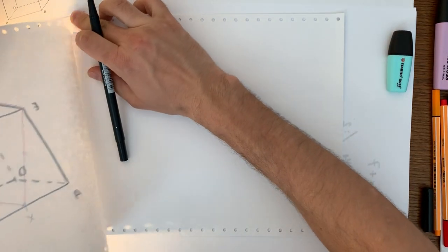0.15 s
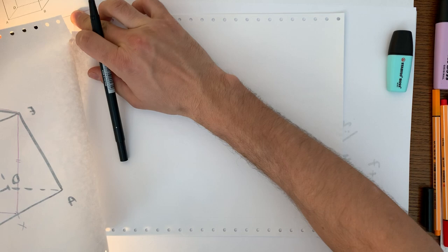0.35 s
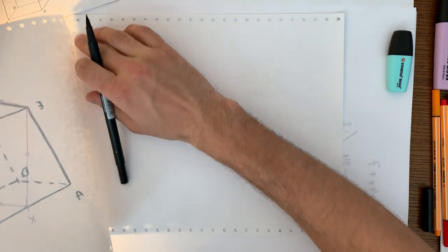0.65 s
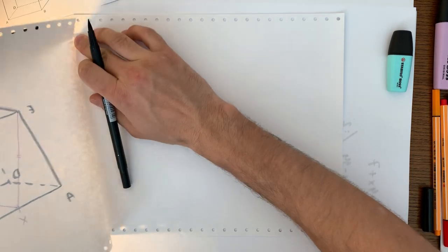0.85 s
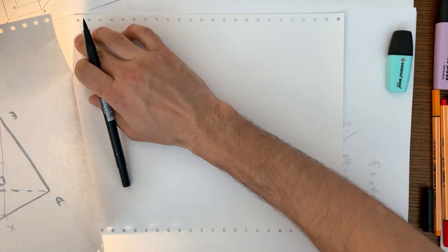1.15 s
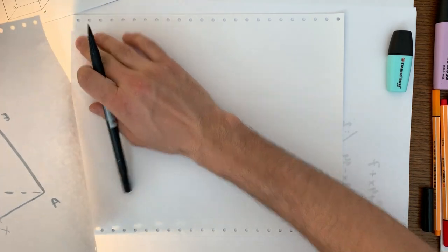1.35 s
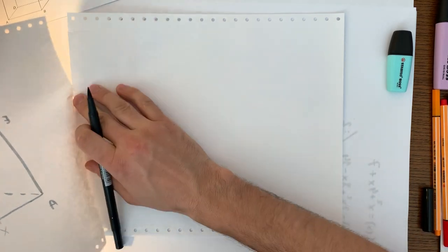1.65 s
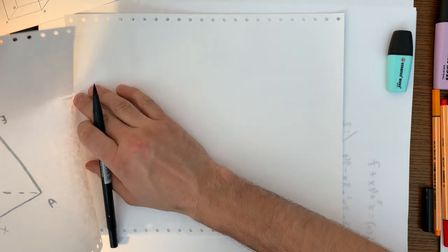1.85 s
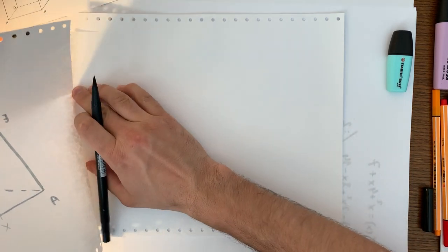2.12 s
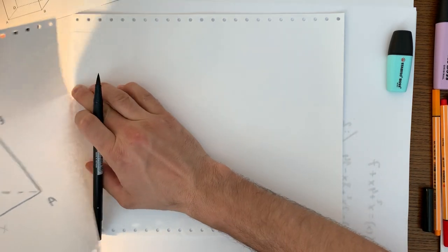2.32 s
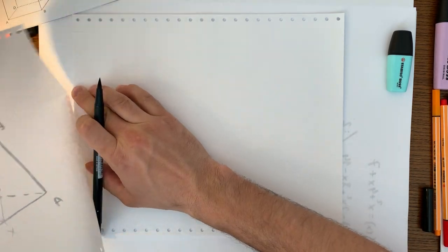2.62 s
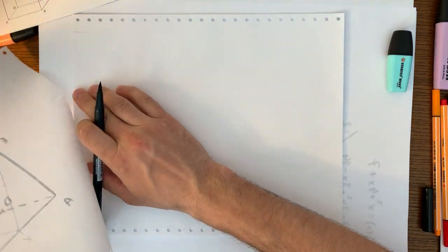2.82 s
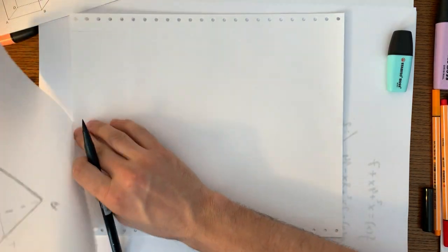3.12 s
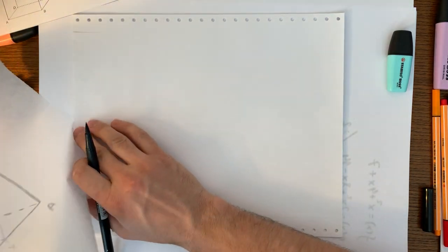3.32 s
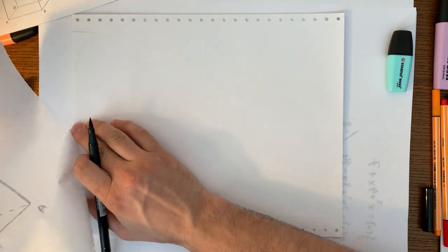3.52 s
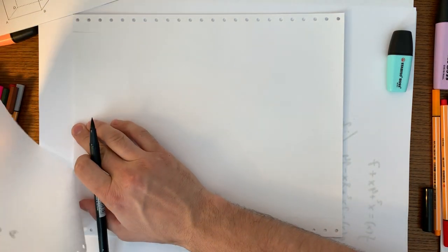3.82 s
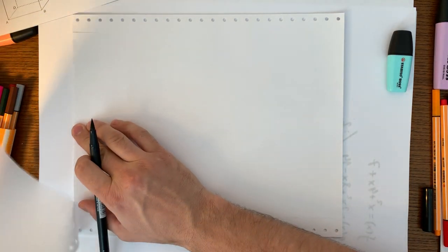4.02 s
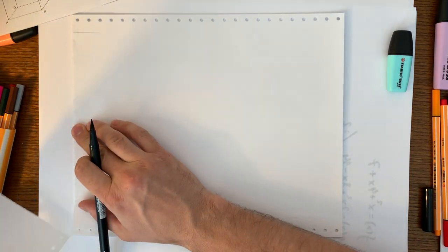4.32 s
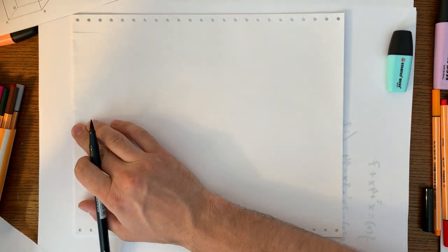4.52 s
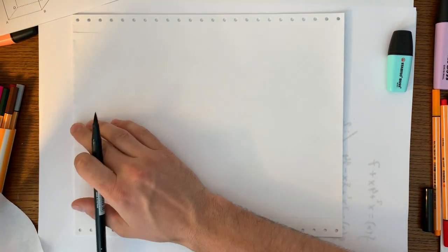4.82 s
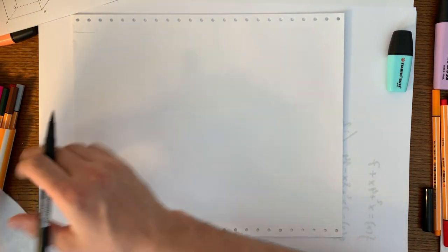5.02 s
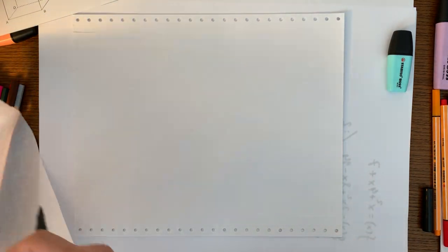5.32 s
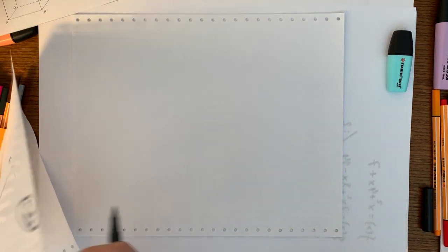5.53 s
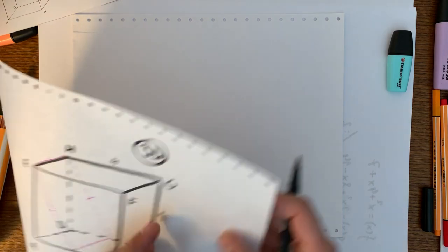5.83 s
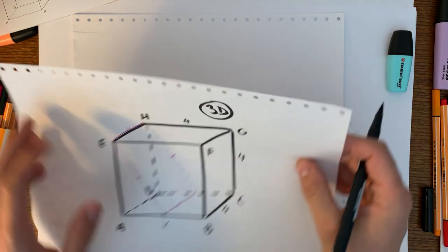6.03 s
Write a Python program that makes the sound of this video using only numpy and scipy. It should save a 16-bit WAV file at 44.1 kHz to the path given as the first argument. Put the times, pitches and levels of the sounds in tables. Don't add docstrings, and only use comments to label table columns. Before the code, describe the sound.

Close-miked paper tearing: a short burst of crisp snaps, a pause with faint creaks, two quick jerks, then a few isolated cracks and the loudest, hardest rip. Light crinkling follows before a long chain of rapid bright snaps finishes the tear. After a near-silent moment, the loose sheet hisses, rustles and softly crackles on the desk. The room is quiet, with a short airy tail.

```python
import sys
import numpy as np
from scipy import signal
from scipy.fft import rfft, irfft
from scipy.io import wavfile
from scipy.ndimage import uniform_filter1d

SR = 44100
rng = np.random.default_rng(int(sys.argv[2]) if len(sys.argv) > 2 else 0)


def transcribe(u):
    v = np.clip(np.atleast_2d(u).T, -1, 1)
    q = np.round(v * 32767).astype(np.int16)
    wavfile.write(sys.argv[1], SR, q)


def to_linear_factor(level_db):
    exponent = np.asarray(level_db, float) / 20
    return 10 ** exponent


N = 271788


def rms_one(x):
    return x / np.sqrt(np.mean(x ** 2) + 1e-20)


def at_hz(points, hz):
    table_hz, values = np.array(points)[:, :2].T
    return np.interp(np.log(hz), np.log(table_hz), values)


def band(x, low_hz, high_hz):
    return signal.sosfilt(signal.butter(2, [low_hz, high_hz], "band", fs=SR, output="sos"), x)


def colour(x, spectrum):
    size = 2 ** 12
    hz = np.maximum(np.arange(size // 2 + 1) * SR / size, 1)
    cepstrum = irfft(np.log(to_linear_factor(at_hz(spectrum, hz))))
    cepstrum[1:size // 2] *= 2
    cepstrum[size // 2 + 1:] = 0
    return signal.fftconvolve(x, irfft(np.exp(rfft(cepstrum))))[:len(x)]


def drift(rate):
    hop, settle = 40, 2000
    r = np.exp(-2 * np.pi * hop * rate / SR)
    draws = rng.standard_normal(N // hop + settle + 2)
    slow = signal.lfilter([1], [1, -2 * r, r * r], draws)[settle:]
    return np.interp(np.arange(N) / hop, np.arange(len(slow)), rms_one(slow))


def quiet_room_floor():
    floor_colour = [(20, 20.5), (60, -26), (300, 2), (1000, -7), (4000, 5.5), (12000, -35), (16000, -1)]
    return to_linear_factor(-77) * rms_one(colour(rng.standard_normal(N), floor_colour))


def grains(per_s, spread_db, smooth):
    sizes = to_linear_factor(spread_db * np.minimum(rng.exponential(1, N), 3.6)) * rng.choice([-1, 1], N)
    slips = rms_one(sizes * (rng.random(N) < per_s / SR))
    return rms_one(slips + smooth * rng.standard_normal(N))


def gestures(rows, attack_db_per_s, swell_db, release_db_per_s, mix_db):
    # rub, rustle, hiss, flap [dB per dB]
    bright_share = [-2.07, 0.49, 1, -0.73]
    t, power = np.arange(0, N + 64, 64) / SR, 0
    for s, length, db, bright, *bend in rows:
        onset = attack_db_per_s * np.maximum(s - t, 0)
        swell = swell_db * np.clip(1 - (t - s) / length, 0, 1)
        release = release_db_per_s * np.maximum(t - s - length, 0)
        shape = db - onset - swell - release
        bend_db = [0, sum(bend), 0, 0]
        layers_db = np.array(mix_db) + bright * np.array(bright_share) + bend_db
        power = power + to_linear_factor(shape + layers_db[:, None]) ** 2
    return np.array([np.interp(np.arange(N) / SR, t, layer) for layer in power])


def handling():
    # start/s, length/s, effort/dB, brightness/dB
    tug_rows = [
        (.181, 0.11, -43, -3),
        (1.044, 0.1, -39.5, -1.5),
        (1.323, 0.01, -39, -3),
        (1.771, 0.018, -44.5, -2.5),
        (2.393, 0.07, -35, 1),
        (3.674, 0.11, -36, 1),
        (3.9, 0.23, -36, 2),
        (4.2, 0.14, -40.5, -0.5),
    ]
    # start/s, length/s, speed/dB, brightness/dB, bend/dB
    slide_rows = [(0, 0.016, -68, 2, -8), (.45, 0.17, -73, -2, 5), (.78, 0.0092, -75.5, -5, 4),
                  (.92, 0.023, -70, -7, -1), (1.65, 0.027, -59, -1.5, -2), (1.70, 0.017, -71, -4.5, -1),
                  (1.75, 0.014, -60, -0.5, -1), (2.065, 0.026, -68.5, 1, 3.5), (2.62, 0.11, -75, 6.5, 12),
                  (2.72, .06, -75.5, 11, 1), (2.83, 0.049, -61.5, 3, -1), (2.92, 0.019, -65, 4, 3),
                  (2.94, 0.028, -72, -5.5, 11), (3.03, 0.075, -67, 0, -6), (3.16, 0.078, -59.5, 2.5, 4.5),
                  (3.35, 0.045, -60, -1, 9), (3.41, 0.037, -65, -3, 2), (4.46, 0.067, -64, 2, 4.5),
                  (4.6, 0.3, -71, 7.5, 7.5), (4.72, 0.33, -66, 1, 5), (5.13, 0.047, -60, 2.5, 4),
                  (5.2, 0.057, -55, 3.5, 3.5), (5.27, 0.044, -54.5, 4.5, 3), (5.4, 0.27, -66.5, 1, 3),
                  (5.81, 0.059, -69, -4, -3), (5.93, 0.11, -61, 1, -6), (6.04, 0.031, -63, 4, 0),
                  (6.115, 0.018, -58, 0, -17)]
    tug_mix = [-6.5, -0.87, -21, -19]
    slide_mix = [2, -4.5, -1, -13]
    rest_db = [-74.5, -112, -78, -75.5]
    # f/Hz, level/dB
    rub_colour = [(200, -15.5), (350, -4), (650, -0.5), (1000, 0.5), (1500, -4), (3500, -24)]
    rustle_colour = [(600, -35), (1000, -10.5), (1300, -11), (2500, -4), (3600, -7.5), (4600, -14.5),
                     (7000, -24)]
    hiss_colour = [(2500, -14), (4000, -10), (5500, 2.5), (7000, 3), (8300, 4), (10000, 4), (12500, 4.5),
                   (16000, -5.5)]
    flap_colour = [(20, -18), (40, 9), (70, 5.5), (150, 5.5), (300, -0.5), (450, -34.5)]
    tugs = gestures(tug_rows, attack_db_per_s=3000, swell_db=7, release_db_per_s=163, mix_db=tug_mix)
    slides = gestures(slide_rows, attack_db_per_s=233, swell_db=1.5, release_db_per_s=128, mix_db=slide_mix)
    rest = to_linear_factor(np.array(rest_db))[:, None] ** 2
    rub_db, rustle_db, hiss_db, flap_db = 10 * np.log10(tugs + slides + rest)
    clumps = drift(15.3)
    rub = rms_one(colour(grains(800, 3.0, smooth=1.5), rub_colour))
    rub = rub * to_linear_factor(rub_db + 1.5 * clumps + .8 * drift(30))
    rustle = rms_one(colour(grains(1500, 3.0, smooth=.7), rustle_colour))
    rustle = rustle * to_linear_factor(rustle_db + 1.7 * clumps)
    hiss = rms_one(colour(grains(7500, 1.7, smooth=1.2), hiss_colour))
    hiss = hiss * to_linear_factor(hiss_db + 1.1 * clumps + .5 * drift(40))
    flap = rms_one(colour(rng.standard_normal(N), flap_colour)) * to_linear_factor(flap_db + drift(7.7))
    return rub + rustle + hiss, flap


def patchy(x):
    octaves = np.log2(np.maximum(np.arange(N // 2 + 1) * SR / N, 1) / 350)
    whole, out = rfft(x), 0
    for k in range(12):
        share = np.clip(1 - np.abs(2 * np.clip(octaves, 0, 5.5) - k), 0, 1)
        out = out + irfft(whole * share, N) * to_linear_factor(2.3 * drift(5))
    return out


def coloured(rows, flutter_ms):
    return [(s, db - bright, db + stiff, db + bright, lead, flutter_ms) for s, db, bright, lead, stiff in rows]


def snap_events():
    # t/s, strength/dB, brightness/dB,
    # lead-in/ms
    bridge_rows = [(.0037, -54, 6.5, 0.27), (0.023, -60, 8, 0.3), (.0602, -77, 8, .3),
                   (0.0734, -40.5, 9, 0.12), (0.1245, -35, -2, 0.22), (0.1817, -39.5, 6, 0.24),
                   (0.1977, -56, -16, 1.8), (.208, -35.5, 2.5, 0.38), (0.232, -37, 4.5, 2.9),
                   (.251, -35.5, 1, 0.36), (.26, -42.5, -8, 6.7), (0.271, -41.5, 9, 0.69),
                   (0.2804, -46, -7, .3), (0.3013, -39, 0.5, 1.1), (0.317, -59, -7, 1.6),
                   (1.025, -67, 13, .3), (1.036, -59, 5, .3), (1.0435, -41.5, 0.5, 0.25),
                   (1.0552, -38.5, 1.5, 0.27), (1.0692, -34.5, 1, 0.33), (1.0888, -33, -3, 0.52),
                   (1.1103, -33.5, 2, 0.22), (1.1252, -31, 1.5, 0.39), (1.1472, -41, 2, 5.7),
                   (1.1542, -38.5, 1, 0.4), (1.168, -38, -1.5, 5.9), (1.3191, -33.5, 4.5, 0.51),
                   (1.3473, -35.5, 6.5, 0.82), (1.377, -49, 4, 2.9),
                   (1.7702, -36.5, 1, 0.3), (1.7889, -35.5, -0.5, 0.48), (2.3805, -58.5, 5, 1.2),
                      (2.393, -36, 6.5, 0.14), (2.4023, -35.5, 6, .5), (2.4204, -33, 0.5, 0.51),
                      (2.444, -27, 2, 1.3), (2.459, -28.5, 3.5, 0.34), (2.4826, -25.5, 1, 0.64),
                      (2.497, -42, 6, 2.8), (3.6733, -38.5, 6, 0.16), (3.6965, -39.5, 3.5, 1.3),
                      (3.7242, -33, 6, 0.7), (3.7432, -41, 10, 0.35), (3.7705, -32.5, 4, 0.56),
                      (3.7811, -43.5, -4.5, 0.73), (3.8005, -44.5, 13, 0.98), (3.8295, -36.5, 3.5, 0.44),
                      (3.85, -45.5, -4, 3.8), (3.8675, -44, -0.5, 3.8),
                   (3.8907, -31.5, 3.5, 0.2), (3.9192, -55, -14, 0.76), (3.9478, -35.5, 6.5, 0.2),
                      (3.9719, -46, -10.5, 6.5), (3.99, -36.5, 6.5, 0.26), (4.0248, -34.5, 3, 0.57),
                      (4.0503, -33, 4, 1.2), (4.0734, -37, 5, .3), (4.1026, -37, 4.5, 1.8),
                      (4.1315, -41, 8, 1.9), (4.156, -39, -3.5, 0.69), (4.196, -43.5, 13, 1.4),
                      (4.2298, -47, -1, 0.79), (4.2482, -45, 9.5, 1.5), (4.2785, -38.5, 3.5, 3.2),
                      (4.3058, -41, 1.5, 3.5), (4.3202, -51, 4, 2.6), (4.3381, -40.5, 5.5, 6.6),
                      (4.346, -46, 11, .6), (4.375, -40, 3.5, 1.7), (4.3928, -42, 2.5, 6.6),
                      (4.4105, -39.5, 3.5, 3.4)]
    # t/s, strength/dB, brightness/dB, lead-
    # in/ms, stiffness/dB
    creases = [(.4347, -66, 10, .8, -20), (.4935, -55.5, -3, 1.4, 7), (.5315, -52, -7, 1.3, 3.5),
               (.6122, -59, -10.5, 0.4, -3), (.7312, -57.5, -11.5, 3.7, -1.5),
               (.7985, -68, -17, 6.9, 0), (.9032, -41, -5.5, 1.7, 6), (.9241, -54, -3, 1.45, -14),
               (.9463, -56, 5.5, .3, 5), (1.6259, -43.5, 11.5, 0.61, -21),
               (1.6571, -50.5, 0.5, 2, 12), (1.6653, -46.5, -7, 0.73, -4),
               (1.7078, -66, -4, 1.3, 16), (1.7407, -61, 15, .3, -5), (2.054, -67, 12.5, 2.4, -16),
               (2.1226, -65, -11, 0.21, 11), (2.179, -69, -13, 0.34, -5),
               (2.1995, -61.5, -1.5, 1.5, -20), (2.2925, -71, -9.5, .3, 2), (2.8319, -71, 4, .6, 3),
               (2.8816, -54.5, 0, 1.4, 0), (2.991, -68, -16, 2.4, 1), (3.0076, -60, -12.5, 0.19, 16),
               (3.0472, -58, 11.5, .3, -6),
               (3.267, -53.5, -7.5, 6.7, 6), (3.377, -61, -13, 3.5, 13.5), (3.4043, -50, -2, .3, 6.5),
                    (3.4422, -57, -10, 1.5, 9), (3.477, -38.5, 0, 4.7, 3.5), (3.624, -50, 0, .25, 4.5),
                    (4.7337, -63, 11.5, 0.8, -14), (4.87, -63.5, -9.5, .6, 15), (4.8874, -62, 0, 0.65, 8),
                    (5.123, -59.5, -3, 0.24, 10), (5.329, -45, 1.5, 1.9, 2), (5.485, -54, -3, 2.2, 7),
                    (5.5083, -40.5, 3.5, .25, 2), (5.5514, -49, -3.5, 5.1, 5.5), (5.5728, -50, -3, 2, 9),
                    (5.706, -58.5, -7.5, .3, 9), (5.7192, -52.5, -1.5, 0.74, 6), (5.7649, -56, -8, 6.9, 2),
                    (5.8255, -56, -9, 7.5, 4.5), (5.8677, -59.5, -11, 6.4, 4), (5.948, -51, -3.5, 6, -6),
                    (5.977, -57, -12.5, 7.1, -11), (6.0793, -51, -7.5, 3.8, 2.5)]
    stiffness_db = 0.7
    bridges = [(*row, stiffness_db) for row in bridge_rows]
    return coloured(bridges, flutter_ms=2.9) + coloured(creases, flutter_ms=1.8)


def snaps(events):
    snap_colour = [(120, -62), (200, -10), (340, -6.5), (473, -13.5), (671, -2), (763, -10.5), (986, -1.5),
                   (1650, -2), (2560, -1.5), (4520, -11.5), (10900, -11), (14600, -11.5), (16000, -18.5)]
    # t/s, lower edge f/Hz
    crack_edge = [(0.1, 4900), (1.0, 5100), (1.35, 6300), (3.7, 5080), (3.95, 5800), (4.05, 8000),
                  (4.3, 6760), (4.42, 6440)]
    lead_in_ms = 20
    release_at = lead_in_ms * SR // 1000
    ms = np.arange(3000) * 1000 / SR - lead_in_ms
    before, after = np.minimum(ms, 0), np.maximum(ms, 0)
    noise = rng.standard_normal((len(events), 4, len(ms)))
    step = 1.0 * (np.arange(len(ms)) == release_at)
    # low f/Hz, high f/Hz, crack/ms, crack/dB, release/dB, flutter stretch, gain/dB
    parts = [(357, 1367, 0.97, 1.6, 26.7, 4.44, -14.5),
             (1670, 7300, 1.0, 15.0, 22.0, 6.05, -13.0),
             (5080, 14400, 0.19, 18.0, 30.0, 0.17, -13.5)]
    out = np.zeros(N)
    for k, (low_hz, top_hz, crack_ms, crack_db, release_db, stretch, gain_db) in enumerate(parts):
        push = np.zeros(N + len(ms))
        for (s, *levels_db, lead_ms, flutter_ms), draws in zip(events, noise):
            lead_ms = np.clip(lead_ms, .1, 6)
            crack = to_linear_factor(crack_db) * np.exp((3 * before - after) / crack_ms) * draws[k]
            crack = crack + to_linear_factor(release_db) * step
            strain = np.exp(before / (lead_ms + .5))
            fade_ms = 2 * np.clip(stretch * flutter_ms, .5, 4) + 1.5 * lead_ms
            flutter = strain * np.exp(-(after / fade_ms) ** 2)
            lumps = to_linear_factor(4.5 * rms_one(uniform_filter1d(draws[3], 40)))
            dull = np.clip(to_linear_factor(levels_db[2] - levels_db[1] + 7), .4, 1) ** (k ** 2 / 4)
            edge_hz = low_hz
            if k == 2:
                edge_hz = min(np.interp(s, *np.transpose(crack_edge)), top_hz * dull / 1.1)
            softer = to_linear_factor(-6.0 * lead_ms - 2.6 * k)
            sound = band(softer * crack + flutter * lumps * draws[k], edge_hz, top_hz * dull)
            at = round(s * SR)
            push[at:at + len(ms)] += to_linear_factor(levels_db[k] + gain_db) * rms_one(sound)
        mean_gain = to_linear_factor(at_hz(snap_colour, np.geomspace(low_hz, min(top_hz, 16000), 20))).mean()
        out += push[release_at:][:N] / mean_gain
    return colour(out, snap_colour)


def pops():
    blips = [(0.0739, 1000, -42.5), (0.1249, 3910, -35), (0.1831, 990, -30.5), (0.2601, 12110, -30),
             (0.2727, 1370, -32), (0.3023, 1050, -34), (0.3152, 2410, -34.5), (0.436, 8250, -46.5),
             (0.5229, 1120, -46), (0.731, 2280, -50), (1.0553, 6870, -27.5), (1.088, 5740, -28.5),
             (1.3379, 3380, -36), (1.369, 3430, -34), (1.378, 2920, -36), (1.6707, 2480, -36),
             (1.7714, 5700, -29.5), (1.77, 1580, -30.5), (1.8024, 1750, -38), (2.2, 680, -51),
             (2.431, 2060, -27), (2.443, 1270, -31), (2.4698, 1650, -30), (2.8816, 2160, -48),
             (2.9738, 1030, -50), (2.9922, 2340, -48), (3.3933, 1160, -44), (3.4217, 2830, -44),
             (3.6435, 1360, -48), (3.691, 2810, -33), (3.71, 1800, -34), (3.7177, 2460, -30),
             (3.8221, 2470, -31.5), (3.852, 2390, -31.5), (3.8996, 2780, -40), (3.9676, 2190, -32),
             (4.0154, 2870, -29), (4.052, 1040, -31), (4.0771, 960, -39), (4.0892, 4250, -31),
             (4.1581, 2830, -32), (4.194, 3350, -33), (4.2214, 2600, -41), (4.2245, 1080, -38),
             (4.3064, 1410, -36), (4.3321, 3310, -36), (4.3468, 2800, -31), (4.408, 3380, -35),
             (4.4304, 2850, -50), (4.7316, 3230, -51), (4.9762, 1020, -55), (5.1213, 2880, -42),
             (5.2535, 2120, -42), (5.3229, 1650, -49), (5.7078, 2010, -46), (6.0977, 1470, -50)]
    ms = np.arange(1200) * 1000 / SR
    out = np.zeros(N + len(ms))
    for s, hz, db in blips:
        rise_ms = .4 + 1.3 * 1000 / hz
        tones = np.sin(2 * np.pi * hz * ms / 1000) + 0.46 * np.sin(2 * np.pi * 1.19 * hz * ms / 1000)
        swell = ms / rise_ms * np.exp(1 - ms / rise_ms)
        out[round((s - rise_ms / 1000) * SR):][:len(ms)] += to_linear_factor(db - 1) * swell * tones
    return band(out[:N], 400, 15000)


def fibres():
    # t/s, peak level/dB, f/Hz, decay/ms
    tear_fibres = [(.1992, -44, 8000, .4), (.2805, -27, 10000, .3), (1.0821, -34, 11000, .4),
                   (1.1041, -40, 13000, 1), (1.3442, -25, 10900, .8), (1.6121, -49, 2400, 3),
                   (1.6256, -25, 6860, 0.6), (1.7371, -43, 11000, .4), (1.7436, -37, 10000, .4),
                   (1.7871, -37, 7000, 1), (1.8571, -41, 5500, 1), (2.3961, -27, 9000, .5),
                   (2.3992, -21.5, 7000, .5), (2.4112, -32, 7500, .5), (2.4162, -34, 7000, 0.99),
                   (2.4391, -30, 7000, .8), (2.4852, -14.5, 9600, 0.6), (3.6651, -46, 6000, 0.9),
                   (3.6901, -33, 7000, 1), (3.7181, -27, 7000, 1), (3.7651, -27, 8000, 1.5),
                   (3.8081, -36, 9000, .6), (3.9371, -42, 10000, .4), (3.9431, -29, 11000, 0.43),
                   (4.0081, -43, 9000, .4), (4.0461, -30, 10000, 1), (4.0696, -29, 10000, .6),
                   (4.0971, -33, 6000, .6), (4.1261, -31, 10000, 1.6), (4.1941, -25, 9000, .4),
                   (4.2171, -38, 11000, .5), (4.2241, -33, 6500, 0.69), (4.2706, -37, 11000, .5),
                   (4.3341, -35, 11500, .6), (4.4036, -34, 9000, .6)]
    buckles = [(0.519, -47.5, 2000, 5), (0.6057, -52, 2500, 1.5), (0.7885, -45.5, 1300, 6.1),
               (.8021, -55, 2190, 3.7), (0.9096, -38, 2200, 3), (2.1811, -56, 11000, 1.5),
               (2.8503, -47, 2100, 4.6), (2.8696, -46, 2000, 2.3), (2.9436, -50, 2500, 2),
               (2.957, -46, 2200, 2.2), (2.97, -44.5, 1800, 2), (2.986, -46, 2980, 1.7),
               (3.0651, -47, 2200, 3.7), (3.1331, -54, 3300, 3), (3.1511, -59, 3200, 3),
               (3.3327, -52, 1920, 3), (3.3494, -42, 1600, 4), (3.3618, -38, 1490, 5.3),
               (3.387, -44, 2000, 3.6), (3.4201, -42, 2290, 4), (3.4336, -34.5, 2080, 4.1),
               (3.47, -36.5, 2300, 5.3), (3.487, -34, 2000, 2.8), (4.7601, -50, 3300, 18),
               (5.314, -42, 2000, 6.6), (5.569, -36.5, 2550, 2), (5.822, -45, 1890, 6.5),
               (5.8274, -44, 6760, 0.55), (5.8581, -47, 1200, 4), (5.935, -45, 1040, 7.8),
               (5.9905, -51, 1880, 5), (6.0561, -47, 900, 5), (6.088, -44, 1500, 5.8)]
    rows, ms = tear_fibres + buckles, np.arange(1500) * 1000 / SR
    out = np.zeros(N + len(ms))
    for (s, db, hz, decay_ms), noise in zip(rows, rng.standard_normal((len(rows), len(ms)))):
        spit = band(noise * np.exp(-ms / decay_ms), hz / 1.4, hz * 1.4)
        out[round(s * SR):][:len(ms)] += to_linear_factor(db) * spit / np.abs(spit).max()
    return out[:N]


def thumps():
    # t/s, f/Hz, level/dB, half-width/ms
    shifts = [
        (.29, 83.8, -59, 35),
        (1.33, 84.6, -61, 12),
        (2.22, 90, -62, 14),
        (2.2, 332, -61, 7.6),
        (2.465, 126.7, -63, 9.1),
        (2.69, 44, -62.5, 93),
        (3.489, 113.5, -55, 5.2),
        (5.116, 220, -58.5, 3.2),
    ]
    t, out = np.arange(N) / SR, 0
    for s, hz, db, ms in shifts:
        swell = np.exp(-((t - s) * 1000 / ms) ** 2)
        out = out + to_linear_factor(db) * swell * np.sin(2 * np.pi * hz * t)
    return out


def flicks():
    # t/s, f/Hz, level/dB, time to fall 60 dB/ms
    spans = [
        (1.627, 2580, -30.5, 9.6),
        (1.7752, 2490, -25, 5.1),
        (2.8321, 2210, -47.5, 6),
        (3.0069, 2370, -34.5, 25),
        (3.164, 7850, -46, 6),
        (3.257, 2910, -41, 8),
        (3.2664, 3070, -36, 18),
        (4.888, 1360, -47.5, 24),
    ]
    length = 2000
    ms = np.arange(length) * 1000 / SR
    out = np.zeros(N + length)
    for (s, hz, db, t60_ms), noise in zip(spans, rng.standard_normal((len(spans), length))):
        r = to_linear_factor(-60000 / (t60_ms * SR))
        resonance = [1, -2 * r * np.cos(2 * np.pi * hz / SR), r * r]
        ring = signal.lfilter([1], resonance, noise * np.exp(-ms / 2.0))
        out[round(s * SR):][:length] += to_linear_factor(db) * ring / np.abs(ring).max()
    return out[:N]


def diffuse(x):
    room_t60 = [(200, 0.54), (600, 0.67), (1400, 0.61), (3700, 0.55), (9700, 0.42), (16000, 0.027)]
    edges = 150 * 2 ** np.arange(0, 7.1, .5)
    white, out = rng.standard_normal((2, N)), 0
    build = np.exp(-1 / (0.0018 * SR))
    for k, (low, high) in enumerate(zip(edges, edges[1:])):
        keep = to_linear_factor(-120 / (at_hz(room_t60, np.sqrt(low * high)) * SR))
        stored = signal.lfilter([1 - keep], [1, -keep], band(x, low, high) ** 2 + 1e-18)
        stored = signal.lfilter([1 - build], [1, -build], stored)
        tail = np.sqrt(stored) * to_linear_factor(2.0 * drift(50)) * rms_one(band(white[k % 2], low, high))
        out = out + to_linear_factor(-.4 * k) * tail
    return out


def room(x):
    # delay/ms, level/dB
    echo_rows = [
        (3.0, -24),
        (5.4, -30),
    ]
    ms = np.arange(900) * 1000 / SR
    near = rng.standard_normal(len(ms)) * np.clip(ms / 1.5, 0, 1) / (1 + (ms / 6.5) ** 5)
    response = to_linear_factor(-6.5) * near / np.linalg.norm(near)
    response[0] = 1
    for delay_ms, level_db in echo_rows:
        response[round(delay_ms * SR / 1000)] += to_linear_factor(level_db)
    return signal.fftconvolve(x, response)[:N] + to_linear_factor(-6) * diffuse(x)


def scene():
    friction, flap = handling()
    sudden = snaps(snap_events()) + pops() + fibres() + flicks()
    return (room(sudden) + patchy(friction) + flap + thumps() + quiet_room_floor())[None]


def top_cut(x):
    return signal.sosfilt(signal.butter(12, 16990, fs=SR, output="sos"), x)


def record(dry):
    overload = .5
    mix = overload * np.tanh(dry / overload)
    return top_cut(mix)


dry = scene()
out = record(dry)
transcribe(out)
```